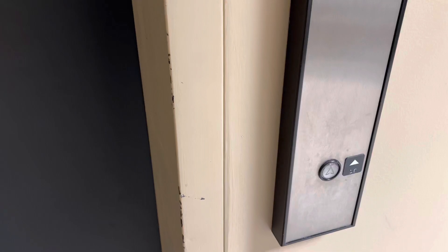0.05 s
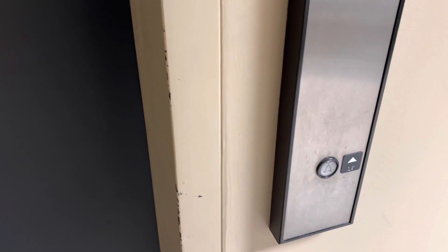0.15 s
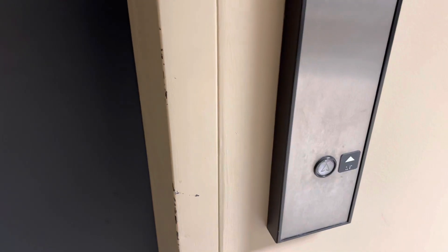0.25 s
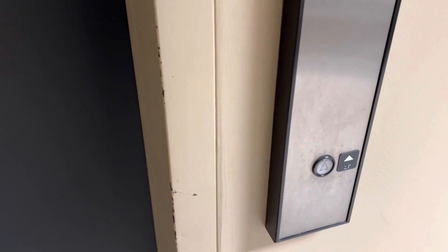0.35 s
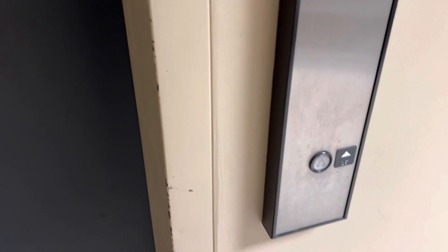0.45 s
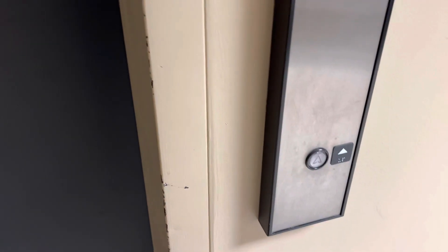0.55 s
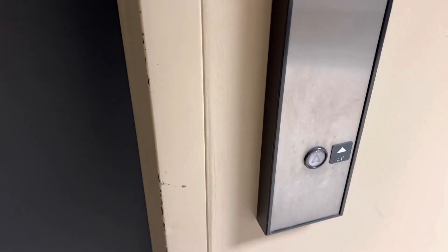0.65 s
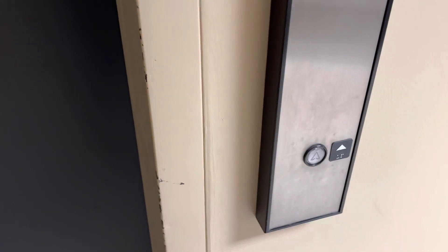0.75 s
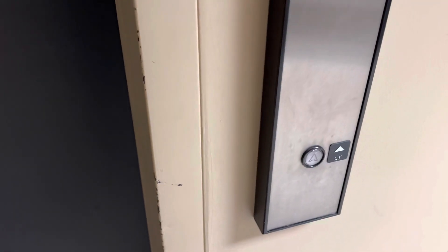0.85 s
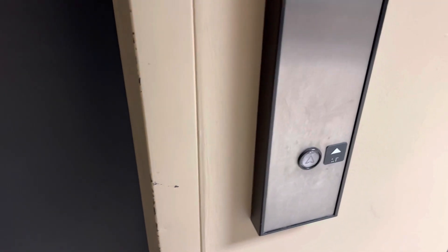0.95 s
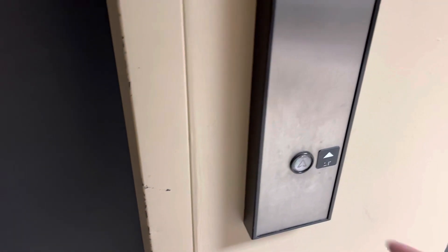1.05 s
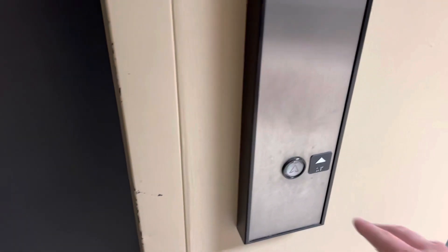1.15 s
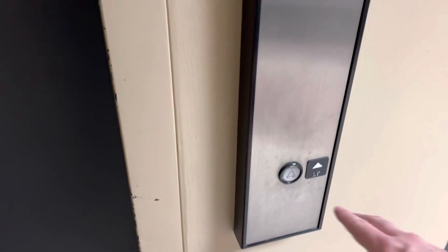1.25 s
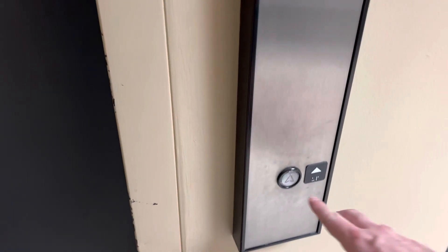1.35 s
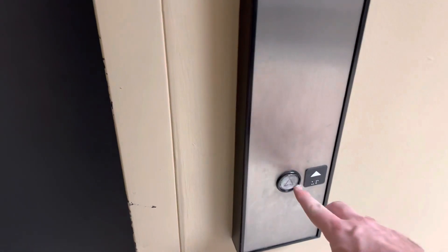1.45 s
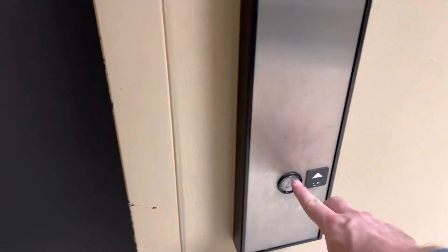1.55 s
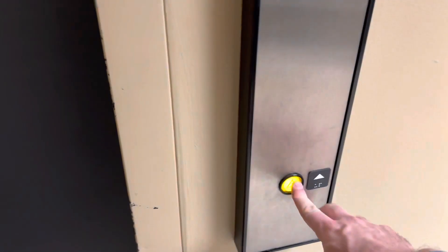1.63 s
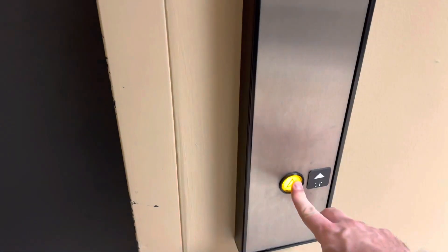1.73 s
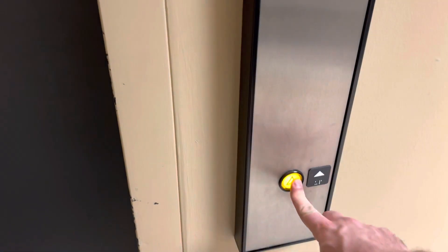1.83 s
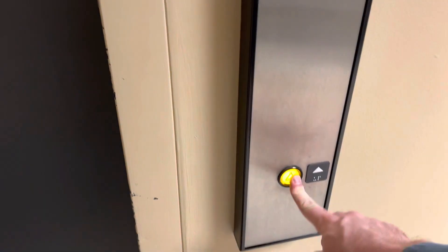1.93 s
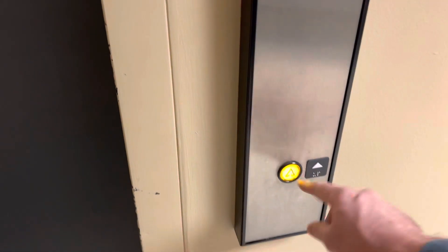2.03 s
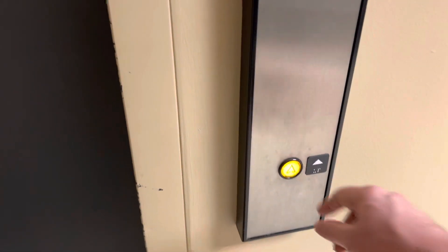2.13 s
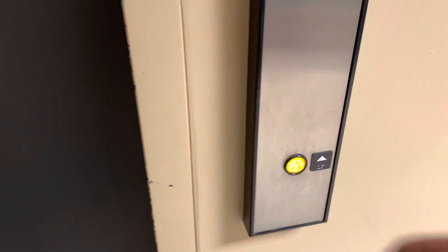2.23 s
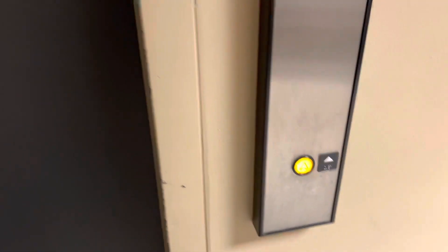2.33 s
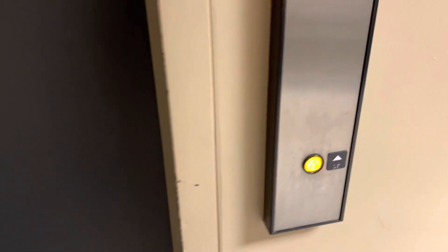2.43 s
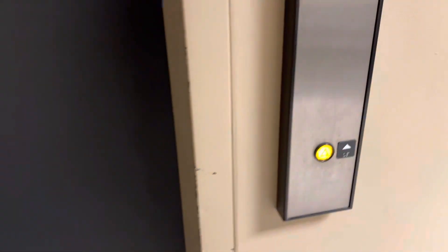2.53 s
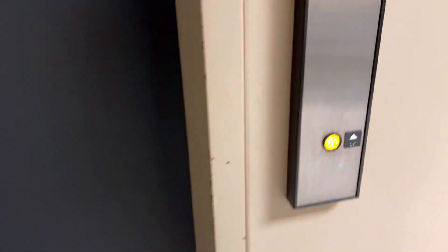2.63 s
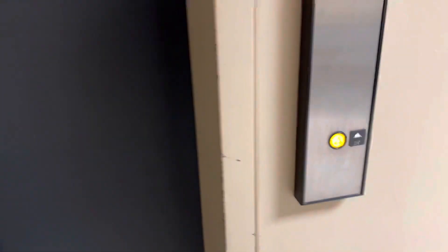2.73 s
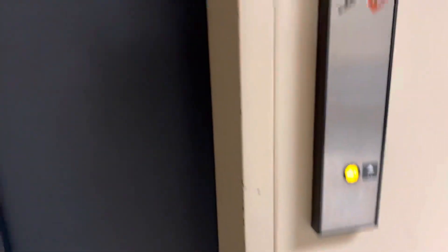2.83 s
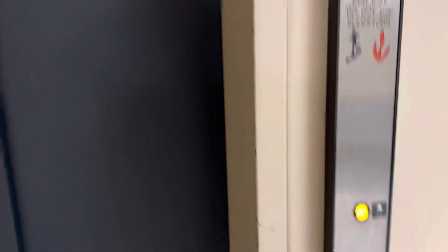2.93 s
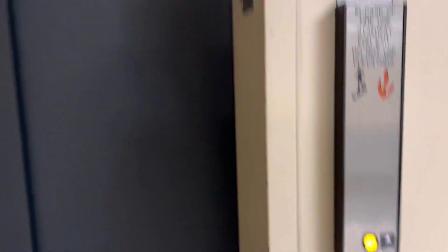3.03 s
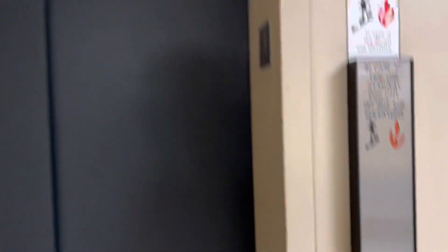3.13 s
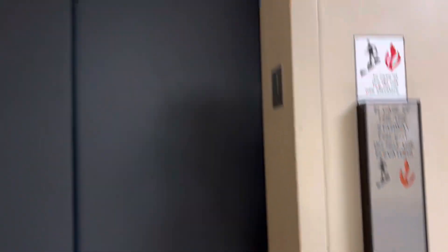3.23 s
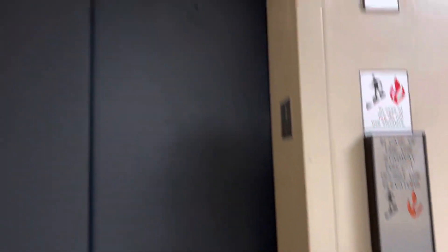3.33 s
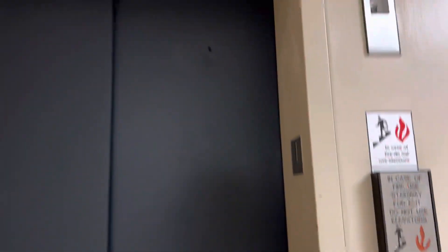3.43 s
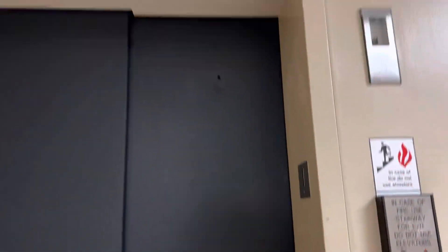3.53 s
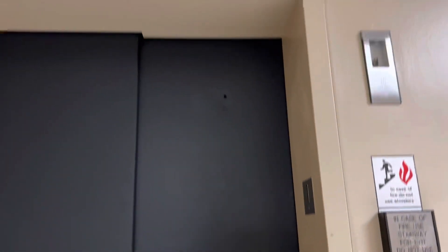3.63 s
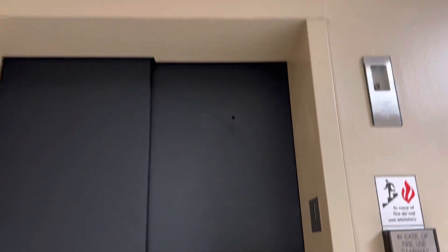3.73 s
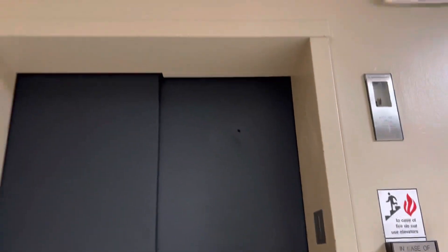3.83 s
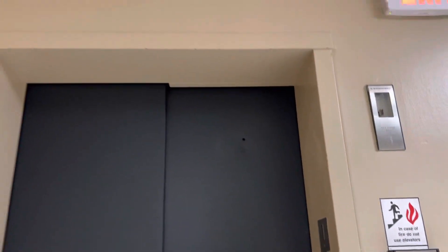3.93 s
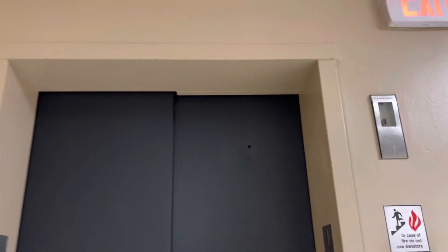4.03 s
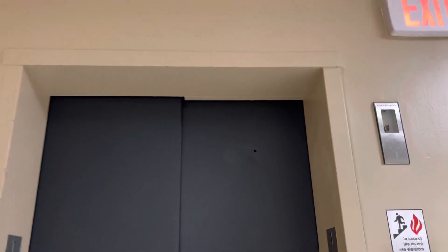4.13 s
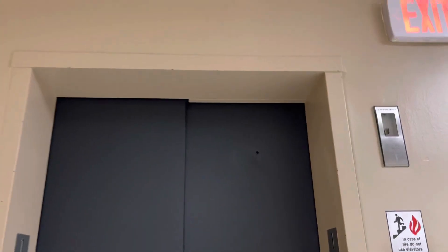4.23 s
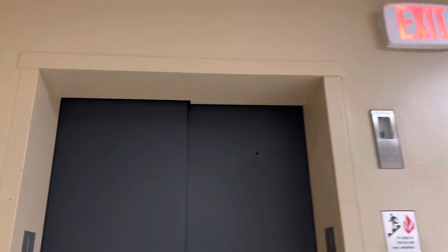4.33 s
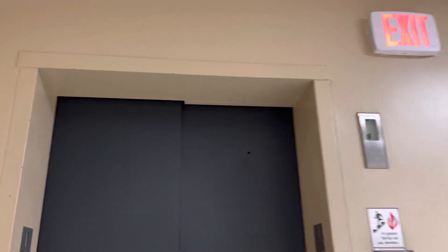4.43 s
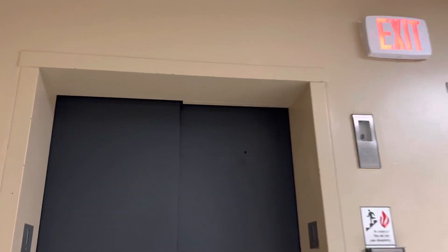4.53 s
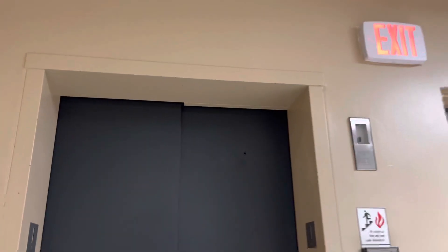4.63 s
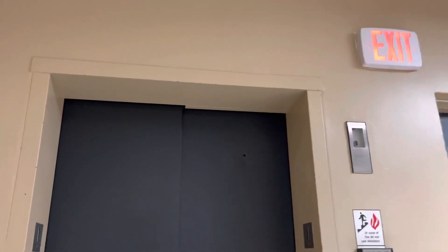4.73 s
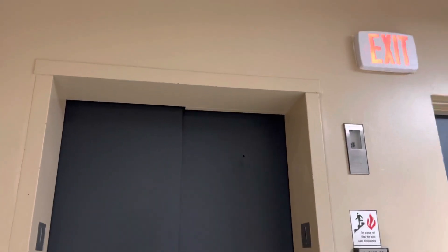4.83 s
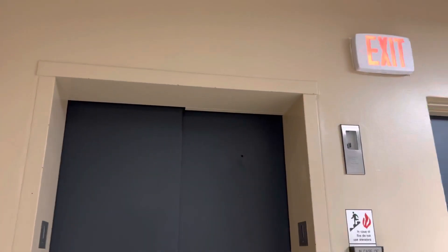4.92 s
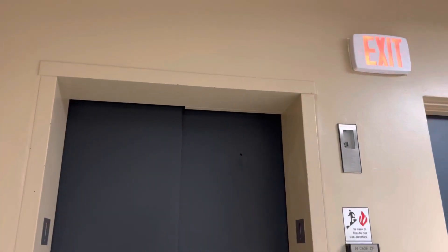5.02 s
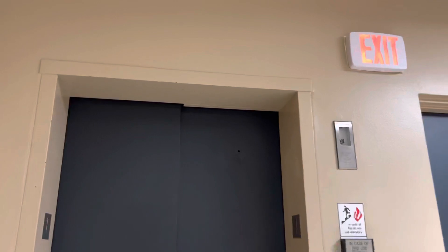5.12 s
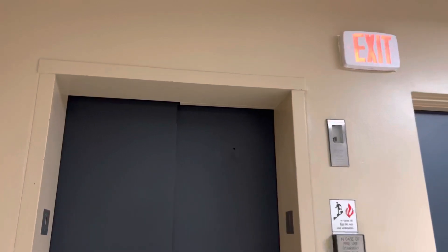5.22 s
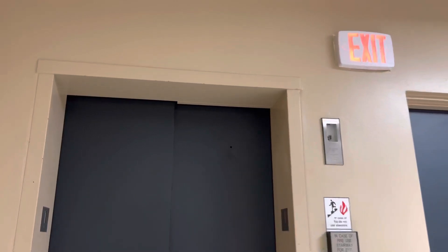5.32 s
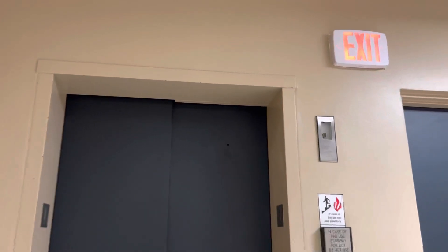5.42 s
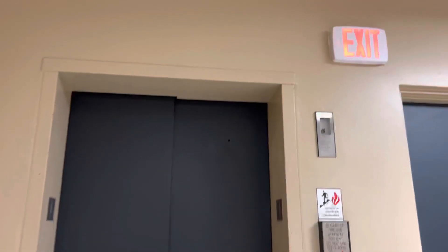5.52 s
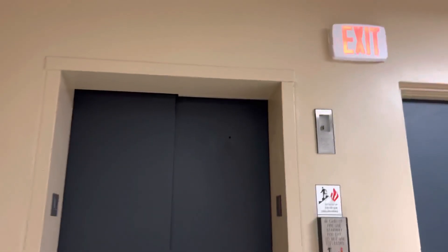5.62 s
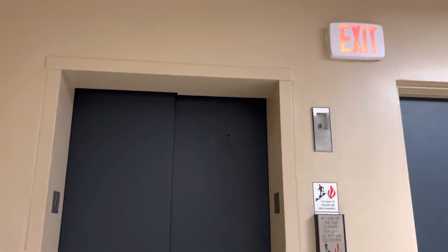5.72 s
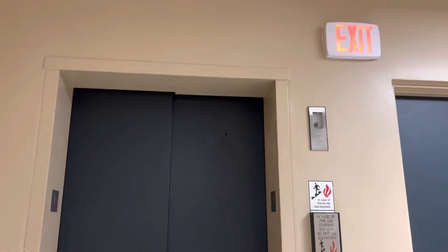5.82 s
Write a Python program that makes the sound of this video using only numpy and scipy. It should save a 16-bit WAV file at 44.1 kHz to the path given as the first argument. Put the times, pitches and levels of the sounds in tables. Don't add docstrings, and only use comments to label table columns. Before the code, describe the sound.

Close to a handheld stereo microphone, a finger presses a lift call button: a bright rattling metal click with a hollow panel thump, then a lighter release click under half a second later. Cloth rustles softly around the movements. A steady low fan hum and airy duct noise fill the hard lobby, shifting as the microphone backs away from the wall.

```python
import sys
import numpy as np
from scipy import signal
from scipy.fft import rfft, irfft, next_fast_len
from scipy.io import wavfile
from scipy.ndimage import uniform_filter1d

SR = 44100
rng = np.random.default_rng(int(sys.argv[2]) if len(sys.argv) > 2 else 0)


def wav_record(signal):
    frames = np.transpose(np.atleast_2d(signal))
    bounded = np.clip(frames, -1, 1)
    quanta = np.round(bounded * 32767).astype(np.int16)
    wavfile.write(sys.argv[1], SR, quanta)


def voltage_ratio(level):
    return 10 ** (np.asarray(level, float) / 20)


N = 258867

# time in seconds, share from 0 to 1.
FACING = [
    (0, 1),
    (2.7, 0.81),
    (3.3, 0.48),
    (4, 0.14),
    (5.9, 0.47),
]
# frequency in Hz, likeness from -1 to 1.
LIKENESS = [(60, 0.95), (150, 0.97), (380, 0.61), (950, 0.02), (2380, 0.2), (5980, 0.072), (15000, 0.15)]
LEFT_LAG_S = 11 / SR


def evened(x):
    return x / np.sqrt(np.mean(x ** 2) + 1e-20)


def read(points, hz):
    f, value = np.transpose(points)
    return np.interp(np.log(hz + 1), np.log(f + 1), value)


def follow(rows, t):
    s, *columns = np.transpose(rows)
    return [np.interp(t, s, c) for c in columns]


def add(mix, s, sound):
    part = mix[..., round(s * SR):][..., :sound.shape[-1]]
    part += sound[..., :part.shape[-1]]


def partner(first, other, same):
    return same * first + np.sqrt(1 - same ** 2) * other


def ring(modes, detune):
    t = np.arange(4000) / SR
    shift = 1 + detune * rng.standard_normal(len(modes))
    out = np.zeros(len(t))
    for k, (hz, db, t60) in enumerate(modes):
        out += (-1) ** k * voltage_ratio(db - 60 * t / t60) * np.sin(2 * np.pi * hz * shift[k] * t)
    return out


def contacts(rows, body):
    # frequency in Hz, level in dB, t60 in seconds.
    small_parts = [(7900, -8, 0.0039), (9320, -2, 0.0095), (9340, -6, 0.0056), (9500, -1, 0.0047),
                   (11450, 1, 0.012), (12120, 1, 0.0071), (12900, -2.5, 0.011)]
    # frequency in Hz, level in dB, t60 in seconds.
    spring = [(13500, -9, .004), (14300, -3, .005), (14850, 0, .008), (15350, 0, .01)]
    out, t = np.zeros((2, N)), np.arange(900) / SR
    for s, snap_db, body_db, rattle_ms, spring_db in rows:
        fade = np.exp(-t * 1000 / max(rattle_ms, .05))
        chatter, other_chatter = rng.standard_normal((2, 900)) * fade
        blow = 2.06 * (t == 0)
        first = chatter + blow
        other = other_chatter + np.roll(blow, 9)
        snap = ring(small_parts, detune=0.0078) + voltage_ratio(spring_db) * ring(spring, detune=0.014)
        cap = ring(body, detune=0.048)
        for part, db, same, lag_s in ((snap, 0, .96, LEFT_LAG_S), (cap, body_db, .72, 0)):
            left = signal.fftconvolve(first, part)
            right = signal.fftconvolve(partner(first, other, same), part)
            gain = voltage_ratio(snap_db + db) / abs(left).max()
            add(out[0], s + lag_s, gain * left)
            add(out[1], s, gain * right)
    return out


def thump():
    # start in seconds, frequency in Hz, peak level in dB, t60 in seconds.
    panel = [
        (1.5745, 432, -27.5, 0.058),
        (1.576, 336, -28, 0.056),
        (1.5747, 560, -30, 0.053),
        (1.578, 674, -39.5, .06),
        (1.582, 191.4, -25, 0.084),
        (1.584, 216.8, -29, 0.083),
        (1.583, 271, -33, 0.065),
    ]
    out, t = np.zeros(N), np.arange(9000) / SR
    for s, hz, db, t60 in panel:
        swell = 1 - np.exp(-t / 0.0034)
        add(out, s, voltage_ratio(db - 60 * t / t60) * np.sin(2 * np.pi * hz * t) * swell)
    return out


def lobby(x):
    # frequency in Hz, t60 in seconds.
    decay = [(300, .3), (2000, .2), (5000, .2), (9000, .09), (15000, .12)]
    taps = np.zeros((2, SR // 2))
    at = np.arange(120, SR // 2 - 20, 20)
    at = at + rng.integers(0, 20, (2, len(at)))
    np.put_along_axis(taps, at, rng.choice([-1., 1.], at.shape), 1)
    taps[0] = 0.54 * taps[0] + 0.64 * np.roll(taps[1], round(LEFT_LAG_S * SR))
    hz, t, z = signal.stft(taps, SR, nperseg=256)
    tail = signal.istft(z * voltage_ratio(-60 * t / read(decay, hz)[:, None]), SR, nperseg=256)[1]
    return signal.fftconvolve(x, tail / np.linalg.norm(tail[0]), axes=1)[:, :N]


def ports(x):
    # frequency in Hz, gain in dB.
    shade = [(2500, 1.5), (4000, 2.5), (5800, -6), (7200, 0), (8200, 1.5)]
    # frequency in Hz, gain in dB.
    edge = [(15500, 0), (15900, -9), (16500, -28), (17000, -50)]
    size = next_fast_len(N)
    hz = np.fft.rfftfreq(size, 1 / SR)
    gain = voltage_ratio([read(edge, hz), read(edge, hz) + read(shade, hz)])
    return irfft(rfft(x, size) * gain, size)[:, :N]


def bins_and_frames():
    return np.fft.rfftfreq(2048, 1 / SR)[:, None], np.arange(N // 512 + 5) * 512 / SR


def stereo_noise(level_db, lean_db, same, patchy_db):
    a, b, c, d, patches = rng.standard_normal((level_db.shape[1], 1025, 5)).T
    patches = evened(uniform_filter1d(uniform_filter1d(patches, 24, 0), 6, 1))
    left = a + 1j * b
    right = partner(left, c + 1j * d, np.clip(same, -1, 1))
    z = np.array([left * voltage_ratio(lean_db / 2), right / voltage_ratio(lean_db / 2)])
    return signal.istft(z * voltage_ratio(level_db + patchy_db * patches), nperseg=2048, noverlap=1536)[1][:, :N]


def sleeve():
    # time of full speed in seconds, hold in seconds, level in dB.
    moves = [
        (1.043, 0.19, -66.5),
        (1.73, 0.16, -72.5),
        (2.125, .2, -70.5),
        (2.765, 0.04, -66.5),
        (3.112, 0.46, -67),
    ]
    # frequency in Hz, level in dB per Hz.
    cloth = [(1760, -10.5), (3000, -8), (3550, -8.5), (6300, -2), (8820, -16), (9530, -16.5), (10300, -53),
             (11800, -23), (16000, -41.5)]
    hz, t = bins_and_frames()
    s, hold, db = np.transpose(moves)[..., None]
    speed_up_db_per_s, slow_down_db_per_s = 69, 56
    rise_db = speed_up_db_per_s * np.maximum(s - t, 0)
    fall_db = slow_down_db_per_s * np.maximum(t - s - hold, 0)
    level_db = 10 * np.log10(np.sum(voltage_ratio(2 * (db - rise_db - fall_db)), 0))
    lean_db = 1.5 + 11 * follow(FACING, t)[0]
    colour_db = read(cloth, hz)
    per_bin_db = colour_db - 10 * np.log10(np.sum(voltage_ratio(2 * colour_db)))
    return voltage_ratio(5.5) * stereo_noise(per_bin_db + level_db, lean_db, same=0.24, patchy_db=2.2)


def hum():
    # frequency in Hz, level in dB, left minus right in dB,
    # left's lead in radians, loss in dB per metre.
    tones = [(88.1, -35.5, -0.6, .17, 2), (120.14, -37, 3, 0.43, 5), (176.2, -52, -3, -0.37, 6.5)]
    # time in seconds, distance from the wall in metres.
    distance = [
        (0, 0.091),
        (2.5, 0.18),
        (3.25, 0.43),
        (3.75, 0.77),
        (4.3, 0.93),
        (5.0, 1.155),
        (5.9, 1.03),
    ]
    wall_return, waver_db, sound_m_per_s = .85, .7, 343
    t, out = np.arange(N) / SR, np.zeros((2, N))
    metres, sides = follow(distance, t)[0], np.array([[.5], [-.5]])
    for hz, db, lean_db, lead, loss_db in tones:
        echo = wall_return * np.exp(4j * np.pi * hz * metres / sound_m_per_s)
        standing = abs(1 + echo) / 2
        waver = evened(sum(np.sin(2 * np.pi * (f * t + rng.random())) for f in np.geomspace(.5, 5, 8)))
        level = standing * voltage_ratio(db - loss_db * metres + waver_db * waver + lean_db * sides)
        out += level * np.sin(2 * np.pi * (hz * t + rng.random()) + lead * sides)
    return np.sqrt(2) * out


def whistles():
    # frequency in Hz, width in Hz, level in dB, change when facing the wall in dB.
    resonances = [(59, 8, -50, 0), (253, 9, -57, -4), (328, 20, -62, 0), (761, 10, -77, 0),
                  (812, 9, -71, 0), (905, 20, -69, 1), (944, 6, -67, 1), (1675, 9, -75, -5),
                  (2036, 10, -79, -2)]
    t, out = np.arange(N) / SR, np.zeros((2, N))
    for hz, width, db, wall_db in resonances:
        r, same = np.exp(-np.pi * width / SR), np.clip(read(LIKENESS, hz), -1, 1)
        air = rng.standard_normal((2, N)) + 1j * rng.standard_normal((2, N))
        a, b = signal.lfilter([1], [1, -2 * r, r * r], air)
        pair = np.array([a, partner(a, b, same)])
        tone = (pair * np.exp(2j * np.pi * hz * t)).real
        out += voltage_ratio(db + wall_db * follow(FACING, t)[0]) * evened(tone)
    return out


def wash():
    # frequency in Hz, level in dB per Hz.
    air = [(20, -4), (65, -10.5), (113, -4.5), (204, -14), (337, -14.5), (642, -25), (923, -23.5),
           (1480, -32.5), (2600, -30.5), (3700, -38), (6010, -35.5), (8650, -45.5), (10200, -62),
           (11800, -51), (16000, -92)]
    # frequency in Hz, left minus right in dB.
    lean = [(60, 4.5), (130, 4.5), (290, 2.5), (640, 0.5), (1410, 1), (3100, 2), (6820, 4.5), (15000, -11)]
    # frequency in Hz, gain in dB.
    wall = [(20, -5), (60, 5), (110, 3.5), (200, -1.5), (300, -0.5), (2800, -2), (4000, -3), (8000, -6)]
    hz, t = bins_and_frames()
    facing = follow(FACING, t)[0]
    level_db = read(air, hz) + read(wall, hz) * facing
    noise = stereo_noise(level_db, read(lean, hz) * facing, read(LIKENESS, hz), patchy_db=1.45)
    return voltage_ratio(-43.5) * evened(noise)


def scene():
    # start in seconds, snap peak in dB,
    # body minus snap in dB, rattle in milliseconds, spring minus snap in dB.
    press = [
        (1.5716, -39, -10, .5, 9),
        (1.5748, -25.5, -1.5, 0.75, 10),
        (1.5797, -33, 2.3, 1.07, -8),
        (1.5834, -29.5, -0.5, 1.5, 6),
        (1.5866, -29.5, 0.5, 0.77, 3),
        (1.5914, -30, -9.5, 1.3, 1),
        (1.5938, -34, -8, .9, 3),
        (1.5966, -43, 7, 6.0, 3),
    ]
    release = [
        (2.0013, -27.5, -11, 0.48, -15),
        (2.0032, -33.5, -3, 1.4, -7),
        (2.0072, -40.5, 4, 2.1, -5),
        (2.0131, -28, -9, 0.79, -1),
        (2.0149, -35, 0.5, 1.9, -11),
        (2.0195, -51, 13, 7.6, -6),
    ]
    ticks = [
        (.2735, -58, -8, .15, 0),
        (1.3445, -52, -25, .6, -12),
        (2.3755, -80, 35, 2.5, -10),
        (3.322, -59, -10, .6, -6),
    ]
    # frequency in Hz, level in dB, t60 in seconds.
    held = [(800, -8, .02), (1050, -3, .03), (1250, -4, .026), (1530, -4, .026), (1850, -4, .022),
            (2050, -2, .02), (2450, -4, .016), (3300, -1, .012), (3650, -2, .014), (4200, -1, .008),
            (4700, -2, .009), (5200, -1, .009), (5800, -2, .008), (6900, -6, .005)]
    free = [(450, -11, .03), (650, -10, .03), (1500, -11, .03), (1750, -8, .04), (2150, -9, .015),
            (2800, -5, .008), (3350, -1, .014), (4020, -3, .008), (4600, -1, .014), (5300, -3, .008),
            (5900, -3, .007), (6700, -2, .008)]
    hand = [(1100, -3, .015), (1500, 3, .015), (1920, 2, 0.013), (2450, -2, .012), (5800, -18, .006)]
    clicks = voltage_ratio(0.8) * (contacts(press, held) + contacts(release, free))
    button = clicks + contacts(ticks, hand) + thump()
    close = ports(button + voltage_ratio(-12.5) * lobby(button))
    return close + sleeve() + hum() + whistles() + wash()


def roll_off(x):
    return signal.sosfilt(signal.butter(12, 16830, fs=SR, output="sos"), x)


def record(dry):
    start_s, settle_s, step_db = .0362, .0015, -29.5
    t = np.maximum(np.arange(N) / SR - start_s, 0)
    settle = np.exp(-t / settle_s)
    opened = dry * (1 - settle) - voltage_ratio(step_db) * settle
    return roll_off(opened * (t > 0))


dry = scene()
out = record(dry)
wav_record(out)
```